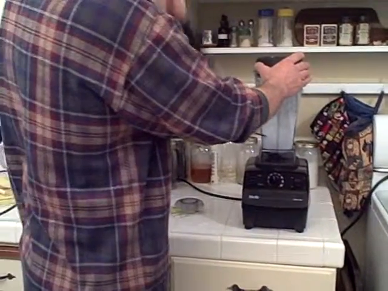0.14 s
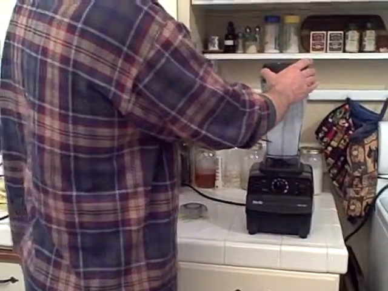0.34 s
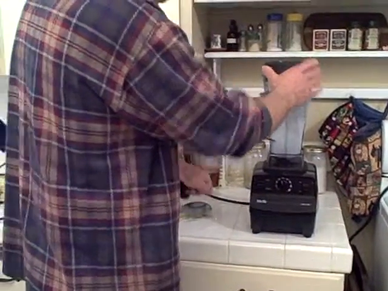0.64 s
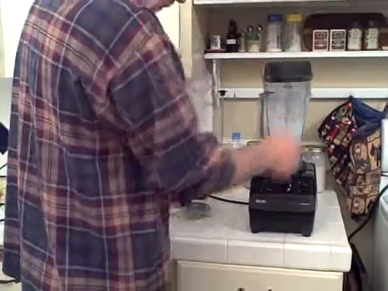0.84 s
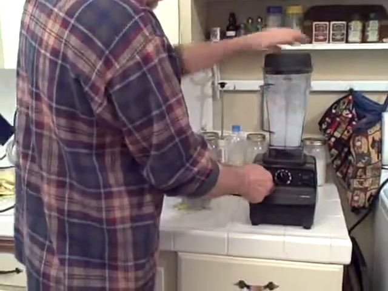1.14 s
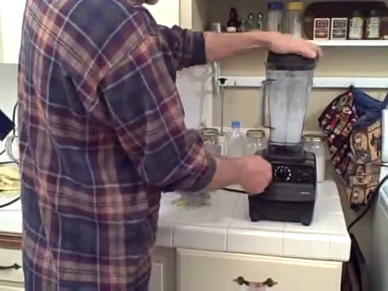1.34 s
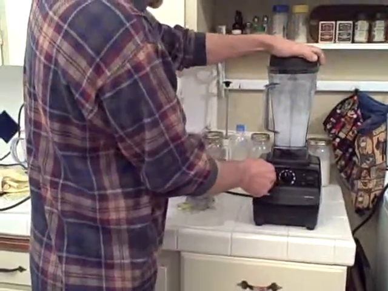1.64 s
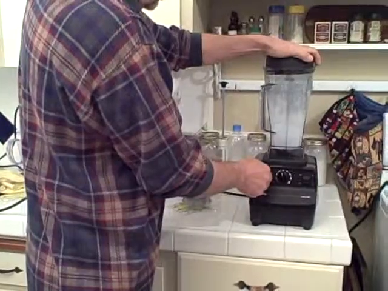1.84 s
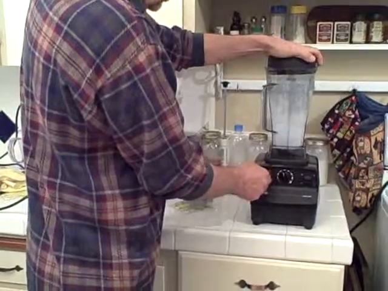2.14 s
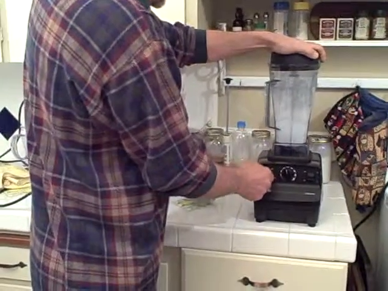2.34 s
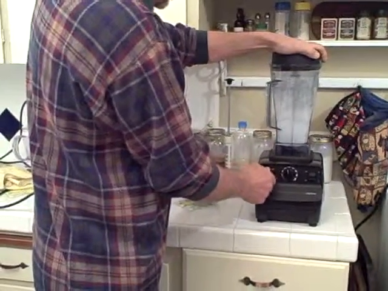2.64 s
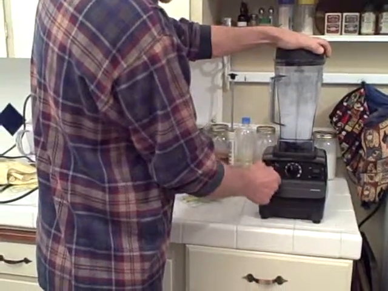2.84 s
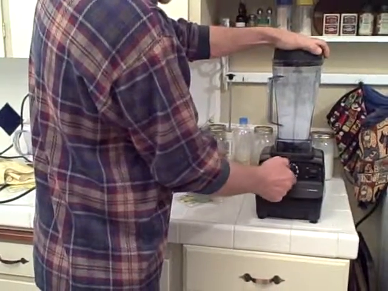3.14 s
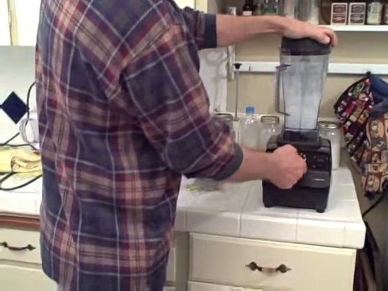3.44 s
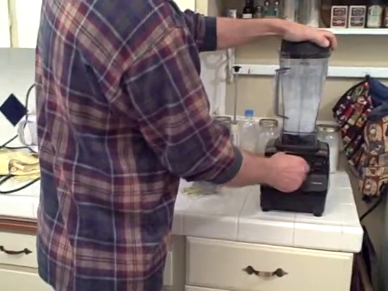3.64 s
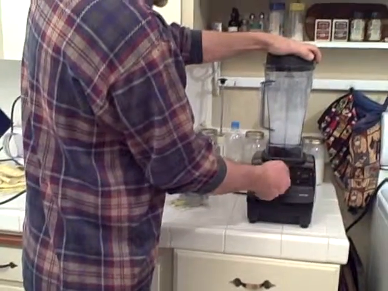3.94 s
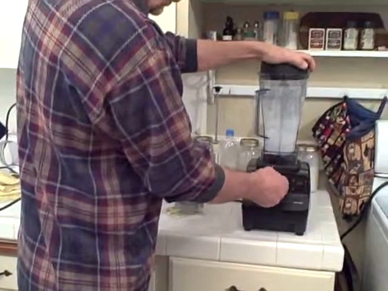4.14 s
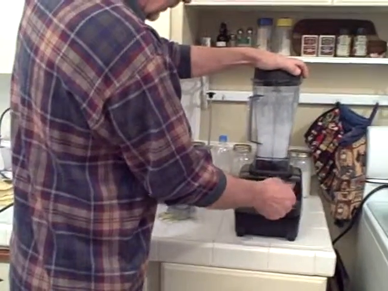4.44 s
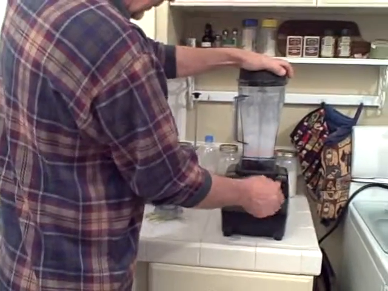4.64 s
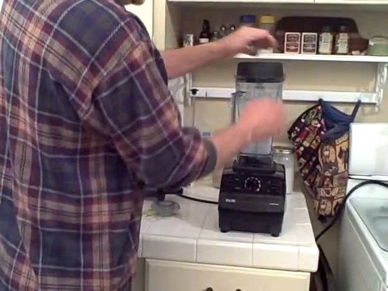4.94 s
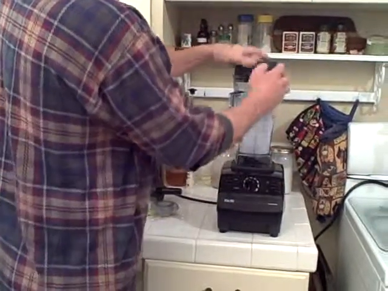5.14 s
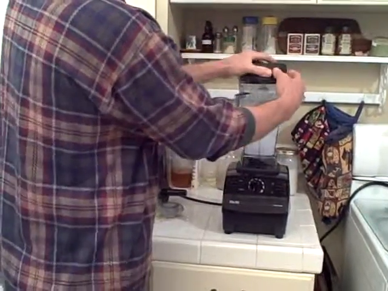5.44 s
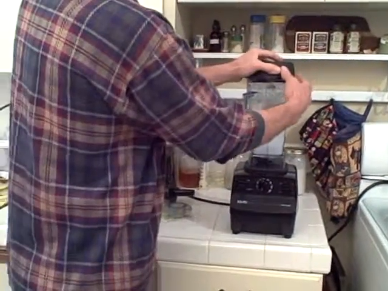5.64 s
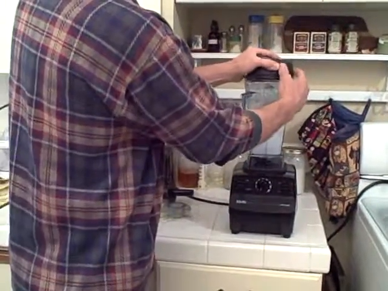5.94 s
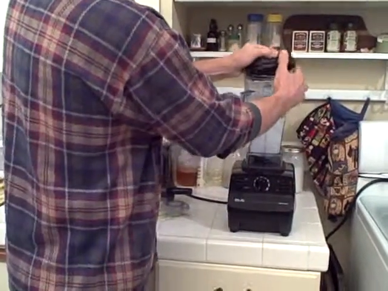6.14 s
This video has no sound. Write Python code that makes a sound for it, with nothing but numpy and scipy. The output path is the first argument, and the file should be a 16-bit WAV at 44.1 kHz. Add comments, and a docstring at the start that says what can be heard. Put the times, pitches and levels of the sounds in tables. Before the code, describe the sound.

In a hard-walled kitchen, ice clatters around a slowly turning blender, with one brief knock of a glass jar. The clatter rises into a loud grinding roar with cracking chunks, a whine and an uneven drone. The motor eases down to a quiet buzz and stops with a sharp click. Another click and soft rubs and bumps of the rubber lid follow over a faint hum, all heard through a small, bright microphone.

```python
"""Ice in a kitchen blender

Blade-driven grains pelt a plastic jug and merge into a roar as the shaft speeds up, with a harmonic
whine and a drone of unbalance; the motor then slows to a soft buzz. Impacts excite a glass jar, the
switch and the rubber lid. A small, bright microphone hears it all in a hard, reverberant room."""
import sys
import numpy as np
from scipy import signal
from scipy.fft import rfft, irfft
from scipy.io import wavfile
from scipy.ndimage import uniform_filter1d

SR = 44100
rng = np.random.default_rng(int(sys.argv[2]) if len(sys.argv) > 2 else 0)


def bounce(signal):
    """Save signal as a 16-bit WAV file at the path given by the first command-line argument."""
    frames = np.transpose(np.atleast_2d(signal))
    limited = np.clip(frames, -1, 1)
    pcm = np.round(limited * 32767).astype(np.int16)
    wavfile.write(sys.argv[1], SR, pcm)


N = 277824
T = np.arange(N) / SR


def undb(db):
    """Amplitude ratio of a level in decibels."""
    return 10 ** (np.asarray(db) / 20)


def unit(x):
    """Normalisation to an rms of 1."""
    return x / np.sqrt(np.mean(x ** 2))


def curve(table):
    """Linear interpolation in time between (t, value) points."""
    return np.interp(T, *np.transpose(table))


def walk(rate):
    """Smooth random fluctuation of unit rms, with `rate` new values a second."""
    hold = int(SR / rate)
    steps = np.repeat(rng.standard_normal(N // hold + 1), hold)
    return unit(uniform_filter1d(steps, hold)[:N])


def colour(x, outline, size=8192):
    """Minimum-phase filtering at unit power gain, following an (f, level) outline."""
    hz, db = np.transpose(outline)
    grid = np.maximum(np.fft.rfftfreq(size, 1 / SR), 1)
    rolloff_db = 20.4 * np.maximum(np.log2(grid / hz[-1]), 0)
    gain = undb(np.interp(np.log(grid), np.log(hz), db) - rolloff_db)
    cepstrum = irfft(np.log(gain))
    response = irfft(np.exp(rfft(2 * cepstrum * (np.arange(size) < size // 2))))
    return signal.fftconvolve(x, response / np.linalg.norm(response))[:N]


def resonate(x, modes, order=1):
    """Superposition of (f, bandwidth, gain) resonances; a higher order steepens their skirts."""
    return sum(undb(db) * signal.sosfilt([np.concatenate(signal.iirpeak(hz, hz / width, SR))] * order, x)
               for hz, width, db in modes)


def room(x, wet_db, t60=.22, gap_s=.003):
    """Reverberation: direct sound, then dense, decaying reflections off tiles and cupboards."""
    t = T[:SR // 3]
    tail = rng.standard_normal(len(t)) * np.exp(-np.log(1000) * t / t60) * (t > gap_s)
    reflections = signal.fftconvolve(x, tail / np.linalg.norm(tail))[:N]
    wet = undb(wet_db)
    return (x + wet * reflections) / np.hypot(1, wet)


def blows(table, wet_db, room_t60=.28):
    """Energy decay: each impact is a noise burst whose energy the room stores and releases."""
    power = np.zeros(N)
    for s, db, t60 in table:
        start = int(s * SR)
        decay = np.exp(-np.log(1000) * np.minimum(T[:N - start] / t60, 10))
        power[start:] += (undb(db) * decay) ** 2
    retained = np.exp(-2 * np.log(1000) / (room_t60 * SR))
    reverberant = signal.lfilter([1 - retained], [1, -retained], power)
    return np.sqrt(power + undb(wet_db) ** 2 * reverberant) * rng.standard_normal(N)


def struck(force, outline, modes, ring_db):
    """Impact response: a body imposes its broad spectrum and its normal modes on a blow."""
    crack = colour(force, outline)
    return crack + undb(ring_db) * resonate(crack, modes)


# background noise spectrum: f/Hz, relative level/dB
KITCHEN_SPECTRUM = [(15, -36), (25, 0.5), (81, -7.5), (114, -22), (138, -10.5), (179, -22.5), (212, -10),
                    (257, -21), (343, -15.5), (436, -22), (656, -22), (1230, -35.5), (7800, -34.5),
                    (10100, -69), (17200, -120)]
# partials of an appliance: f/Hz, rms level/dB
HUM_PARTIALS = [(73, -58.5), (145, -69.5), (221, -75), (339, -71), (646, -67.5)]
def kitchen(noise_db=-52):
    """Ambient noise: the line spectrum of an appliance over continuous rumble and hiss."""
    hum = sum(undb(db) * unit(np.sin(2 * np.pi * hz * T + .3 * walk(12))) for hz, db in HUM_PARTIALS)
    return hum + undb(noise_db) * unit(colour(rng.standard_normal(N), KITCHEN_SPECTRUM))


# slips of the lid, and bumps as it comes free: t/s, relative level/dB, T60/s
LID_SLIPS = [(5.15, -62.5, 0.34), (5.18, -58, 0.61), (5.495, -58.5, 0.65), (5.765, -59.5, 0.21),
             (5.785, -51, .2), (5.806, -47, 0.11), (5.912, -33, 0.059), (6.027, -28, 0.04),
             (6.055, -55, 0.11), (6.082, -40, 0.076)]
LID_BUMPS = [(6.03, -41.5, 0.63), (6.11, -39.5, .3), (6.243, -34.5, 0.15)]
# spectra of a slip and of a bump: f/Hz, relative level/dB
SLIP_SPECTRUM = [(100, -17.5), (233, -3), (500, -12.5), (940, -11.5), (1270, -16), (1680, -11), (2500, -14),
                 (3510, -11.5), (5000, -8), (6400, -0.5), (7300, -7), (8400, -24.5)]
BUMP_SPECTRUM = [(25, -5), (45, -1), (72, -4.5), (110, -12), (160, -17.5), (250, -20), (400, -27)]
# lid resonances: f/Hz, bandwidth/Hz, gain/dB
LID_MODES = [(935, 61, -1), (1670, 97, -3), (2370, 120, -7), (2800, 85, -1), (3290, 30, -2)]
# thin rings as it is handled: t/s, f/Hz, level/dB, T60/s
LID_RINGS = [(5.497, 5180, -53, 0.92), (5.515, 3526, -59, 0.76), (6.13, 1477, -57, .6),
             (6.24, 1477, -54, 0.27)]
def lid(slip_db=-2, bump_db=-1):
    """Stick and slip: the rubber lid works loose with dull bumps and damped, wavering rings."""
    slips = blows(LID_SLIPS, wet_db=6.5, room_t60=.48)
    sound = undb(slip_db) * struck(slips, SLIP_SPECTRUM, LID_MODES, ring_db=2.5)
    sound += undb(bump_db) * colour(blows(LID_BUMPS, wet_db=0), BUMP_SPECTRUM)
    for s, hz, db, t60 in LID_RINGS:
        t = np.maximum(T - s, 0)
        envelope = np.exp(-np.log(1000) * t / t60) * (1 - np.exp(-t / .005))
        sound += undb(db + 1.3 * walk(30)) * envelope * np.sin(2 * np.pi * hz * t + .4 * walk(40))
    return sound


# knocks of the jar on the tiles: t/s, relative level/dB, T60/s
JAR_KNOCKS = [(.8715, -12.5, .035), (.878, -15, 0.05), (.896, -22, 0.1)]
# spectrum of a knock: f/Hz, relative level/dB
JAR_SPECTRUM = [(100, -2.5), (250, -5), (600, -10.5), (1200, -7.5), (1650, -2.5), (2000, -6), (2350, 2),
                (2800, 2.5), (3300, -0.5), (4200, -2), (5500, 2), (8000, -23)]
# glass resonances: f/Hz, bandwidth/Hz, gain/dB
JAR_MODES = [(1650, 110, -2.5), (2264, 70, -3.5), (2810, 80, -2.5), (4160, 67, -8.5)]
def jar():
    """Impact excitation: a glass jar is set down and rocks briefly, each contact ringing its modes."""
    return struck(blows(JAR_KNOCKS, wet_db=2, room_t60=.35), JAR_SPECTRUM, JAR_MODES, ring_db=5)


# switch clicks: t/s, relative level/dB, T60/s, bass gain/dB
SWITCH_CLICKS = [(4.4901, -10.5, .015, 2), (4.763, -50.5, 0.12, -3), (4.779, -40, 0.11, 7),
                 (4.802, -31.5, 0.049, -7), (4.807, -22.5, 0.019, -17)]
# spectrum of a click: f/Hz, relative level/dB
SWITCH_SPECTRUM = [(80, -14), (130, -35), (290, -2.5), (430, -17), (700, -2), (1090, -9.5), (1550, -7),
                   (2000, -6), (2540, -6), (3200, -5), (4250, -8.5), (5300, -2.5), (6200, 5.5),
                   (7300, -2.5), (8400, -20)]
# resonances of the blender's base: f/Hz, bandwidth/Hz, gain/dB
BASE_MODES = [(296, 39, -6), (745, 15, 0), (1560, 50, -5), (2570, 60, -2), (3830, 70, 5)]
def switches(gain_db=-1, bass_hz=700):
    """Transient excitation: each click jolts the modes of the base, with its own share of bass."""
    force = np.zeros(N)
    for s, db, t60, bass_db in SWITCH_CLICKS:
        click = blows([(s, db, t60)], wet_db=4, room_t60=.41)
        bass = signal.sosfilt(signal.butter(1, bass_hz, fs=SR, output="sos"), click)
        force += click + (undb(bass_db) - 1) * bass
    return undb(gain_db) * struck(force, SWITCH_SPECTRUM, BASE_MODES, ring_db=-5)


def running(off_s=4.49, coast_s=.03):
    """Exponential decay: 1 while the motor is on, dying away after the switch cuts it."""
    return np.exp(-np.maximum(T - off_s, 0) / coast_s)


# motor housing resonances: f/Hz, bandwidth/Hz, gain/dB
HOUSING_MODES = [(231, 116, -9), (365, 72, -6.5), (456, 30, -1.5), (787, 69, -1), (897, 46, -2),
                 (1324, 110, -22), (2720, 110, -19.5)]
def motor_buzz(pulse_hz=120, depth=.73, start_s=3.53, rise_s=.4, level_db=-45.5):
    """Amplitude modulation: at the lowest setting, pulses of mains current rattle the housing."""
    rattle = rng.standard_normal(N) * (1 + depth * np.cos(2 * np.pi * pulse_hz * T))
    envelope = np.clip((T - start_s) / rise_s, 0, 1) * running()
    return unit(resonate(rattle, HOUSING_MODES, order=2)) * undb(level_db) * envelope


# groans of jug and base: t/s, Gaussian spread/s, f/Hz, bandwidth/Hz, level/dB
GROANS = [(1.365, 0.043, 272.3, 18.6, -29.5), (1.385, 0.042, 1680, 240, -29),
          (1.394, 0.012, 770, 410, -29.5), (1.45, 0.034, 2626, 110, -27.5), (2.878, 0.026, 874, 160, -26.5),
          (3.224, 0.031, 273, 44, -34)]
def groans():
    """Resonance: modes of the jug and base swell briefly as the motor speeds up and slows down."""
    sound = np.zeros(N)
    for s, spread, hz, width, db in GROANS:
        band = unit(resonate(rng.standard_normal(N), [(hz, width, 0)], order=2))
        sound += undb(db) * np.exp(-((T - s) / spread) ** 2 / 2) * band
    return sound


# vibration of the base: t/s, relative level/dB
SHAKE_LEVEL = [(1.5, -40), (1.54, -22.5), (1.646, -17), (1.72, -26), (1.776, -18), (1.868, -18),
               (2.058, -27.5), (2.174, -17), (2.294, -21.5), (2.414, -15), (2.508, -27), (2.554, -18),
               (2.748, -29.5), (2.78, -41), (2.882, -32.5), (2.932, -18), (2.992, -26), (3.012, -17.5),
               (3.16, -38)]
def drone(hz, turns, fast, gain_db=3, flutter=.17, onset_hz=105, full_hz=185):
    """Rotating unbalance shakes the base once a turn, unsteadily as the blade catches on the ice."""
    stumble = (flutter + 1 - fast) * (walk(55) + 1j * walk(55))
    vibration = np.imag((1 + stumble) * np.exp(2j * np.pi * turns)) / np.hypot(1, 2 * (1 - fast))
    unbalance = np.clip((hz - onset_hz) / (full_hz - onset_hz), 0, 1)
    return vibration * unbalance * undb(curve(SHAKE_LEVEL) + gain_db)


# overtones of the drive: multiple of the shaft rate, relative level/dB
WHINE_ORDERS = [(3, -8), (5, -4.5), (6, -6.5), (7, -7.5), (9, -8.5), (10, -9), (11, -6.5), (12, -6),
                (13, 1), (14, -0.5), (15, -1.5), (16, 1), (17, 4), (18, 4.5), (19, 2), (20, 1.5), (21, 2.5),
                (22, 8.5), (23, 3.5), (24, 2.5), (25, -6.5)]
# resonances that sing as an overtone passes through: f/Hz, bandwidth/Hz, gain/dB
SINGING_MODES = [(1450, 30, -2), (1694, 24, 7.5), (1935, 40, -1), (3830, 54, -7), (4595, 23, 0)]
def whine(turns, strength, gain_db=-7, wobble_rad=.2):
    """Harmonic series: coupling and fan repeat every turn; the uneven load jostles each phase."""
    harmonics = np.zeros(N)
    for order, db in WHINE_ORDERS:
        phase = 2 * np.pi * order * turns + wobble_rad * walk(60) + 2 * np.pi * rng.random()
        harmonics += undb(db) * np.sin(phase)
    tones = undb(gain_db) * strength * unit(harmonics)
    return room(tones + resonate(tones, SINGING_MODES), wet_db=1)


def pelting(force, rate, scatter_db, walls=4):
    """Shot noise: grains strike each wall at random, and each wall has its own path through the room."""
    sound = np.zeros(N)
    for _ in range(walls):
        sizes = undb(scatter_db * np.minimum(rng.exponential(size=N), 5))
        hits = rng.random(N) < rate / SR
        grains = unit(hits * sizes * rng.choice([-1, 1], N))
        sound += room(grains * force, wet_db=-1)
    return sound / np.sqrt(walls)


# spectra of coarse and of fine ice on the jug: f/Hz, relative level/dB
COARSE_SPECTRUM = [(40, -17.5), (70, -13), (110, -16), (170, -18), (224, -7.5), (330, -15.5), (560, -17),
                   (872, -12.5), (1200, -19.5), (1490, -10.5), (1900, -16.5), (2210, -13), (3170, -15),
                   (5000, -8.5), (6260, -0.5), (7500, -8), (8400, -23.5)]
FINE_SPECTRUM = [(40, -20.5), (130, -18.5), (330, -10), (600, -12.5), (900, -9), (1200, -15), (1900, -13.5),
                 (3100, -17), (4300, -12.5), (5400, -7), (6400, 0), (7400, -7.5), (8300, -22), (9000, -31)]
# jug resonances: f/Hz, bandwidth/Hz, gain/dB
JUG_MODES = [(250, 47, -1.5), (875, 230, -7), (1466, 23, 0.5), (1690, 72, -1)]
def ice(turns, fine_share, drive, blade_depth=.44, fine_db=-2):
    """Blade-passage modulation: grains pelt the jug as each end sweeps by, merging to a roar at speed."""
    grip = np.minimum(drive / undb(-26), 1)  # a crawling blade only stirs the slush
    passage = (np.cos(2 * np.pi * turns) + np.cos(4 * np.pi * turns)) / 2
    force = drive * (1 + blade_depth * grip * passage) * undb(walk(30.09))
    coarse = colour(pelting(force * np.sqrt(1 - fine_share), rate=1200, scatter_db=3), COARSE_SPECTRUM)
    fine = colour(pelting(force * np.sqrt(fine_share), rate=3000, scatter_db=2), FINE_SPECTRUM)
    return coarse + .28 * resonate(coarse, JUG_MODES) + undb(fine_db) * fine


# large chunks breaking: t/s, relative crack level/dB, treble gain from splinters/dB
CHUNKS = [(0.3459, -0.5, -0.5), (1.0646, -8.5, -1.5), (1.1967, -6.5, 0.5), (1.3937, 4.5, 1.5),
          (1.6357, -2, 2), (1.7445, -3, 3.5), (1.86, -3.5, 3.5), (2.1794, -2, 2), (2.4227, 5.5, 2.5),
          (2.73, -8.5, 0), (2.8794, 5.5, 1), (3.196, -5.5, 1.5), (3.31, -7.5, 2.5)]
def chunks(gain_db=-13, t60=.022):
    """Brittle fracture: the blade shatters each large chunk with a short crack."""
    cracks = [(s, db + gain_db, t60) for s, db, _ in CHUNKS]
    return colour(blows(cracks, wet_db=2), COARSE_SPECTRUM)


def jug_walls(churn, hz, slush, body_db=1, slush_db=-2, crawl_db=-5, split_hz=3800, spread_s=.039):
    """Flexing walls radiate the lower tones, less under slow slush; splinters swell the treble."""
    body = signal.sosfiltfilt(signal.butter(2, split_hz, fs=SR, output="sos"), churn)
    flex_db = body_db + slush_db * slush + crawl_db * (CRAWL_HZ / hz) ** 4
    splinters_db = sum(db * np.exp(-((T - s) / spread_s) ** 2 / 2) for s, _, db in CHUNKS)
    return body * undb(flex_db) + (churn - body) * undb(splinters_db)


FIRST_HZ, CRAWL_HZ = 70.08, 33.5  # shaft rates on the first and the lowest setting
# shaft rate with the dial up, sagging under the ice: t/s, f/Hz
SHAFT_RATE = [(1.52, 241.7), (1.552, 246.2), (1.602, 263.4), (1.714, 285.1), (1.772, 287.1), (2.046, 281.2),
              (2.288, 294.7), (2.478, 280.8), (2.684, 306.4), (2.86, 311.2)]
def shaft_speed(rise_octaves_per_s=6.3, settle_s=.41, settle_shape=1.55):
    """Rotation frequency: the dial sweeps it up exponentially, then eases it to the lowest setting."""
    up_s, down_s = SHAFT_RATE[0][0], SHAFT_RATE[-1][0]
    octaves_below = rise_octaves_per_s * np.maximum(up_s - T, 0)
    hz = np.maximum(curve(SHAFT_RATE) / 2 ** octaves_below, FIRST_HZ)
    settling = np.exp(-(np.maximum(T - down_s, 0) / settle_s) ** settle_shape)
    return CRAWL_HZ + (hz - CRAWL_HZ) * settling


def churn_force(hz, cubes, full_hz=290, full_db=-14, db_per_octave=11, cubes_db=14.5, stir_db=-46):
    """Power law: churning grows with speed above a floor of stirring; whole cubes make it louder."""
    db = full_db + db_per_octave * np.log2(hz / full_hz) + cubes_db * cubes
    return np.hypot(undb(db), undb(stir_db)) * running()


def blender(coarse_hz=80, fine_hz=220, crushed_s=1.585, crushing_s=.38):
    """Forced vibration: one shaft drives the ice, whine and drone, amid cracks and groans."""
    hz = shaft_speed()
    turns = np.cumsum(hz) / SR
    fast = np.clip((hz - 90) / 170, 0, 1)
    cubes = np.clip((crushed_s - T) / crushing_s, 0, 1)  # share of the ice still whole
    slush = (1 - fast) * (1 - cubes)
    fine_share = np.clip((hz - coarse_hz) / (fine_hz - coarse_hz), 0, 1) * (1 - cubes)
    drive = churn_force(hz, cubes)
    churn = whine(turns, fast * drive) + ice(turns, fine_share, drive)
    return jug_walls(churn, hz, slush) + chunks() + groans() + drone(hz, turns, fast)


def scene():
    """Superposition: all sources in the kitchen add at one microphone."""
    return (blender() + motor_buzz() + jar() + switches() + lid() + kitchen())[None]


def record(dry, mic_hz=8650, ceiling=.78, top_hz=16000):
    """Band limiting and saturation: the microphone loses the highest treble and clips loud peaks."""
    heard = signal.sosfilt(signal.cheby1(12, .3, mic_hz, fs=SR, output="sos"), dry)
    clipped = np.clip(heard, -ceiling, ceiling)
    return signal.sosfilt(signal.ellip(8, .2, 70, top_hz, fs=SR, output="sos"), clipped)


dry = scene()
out = record(dry)
bounce(out)
```